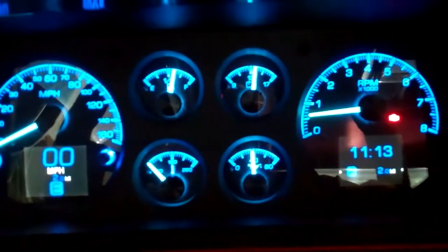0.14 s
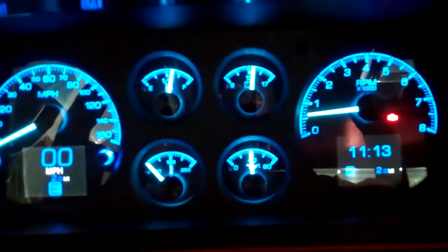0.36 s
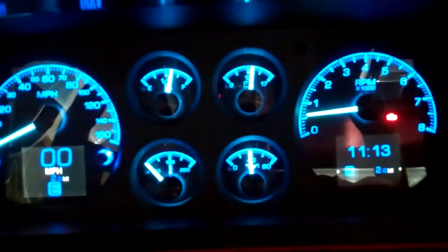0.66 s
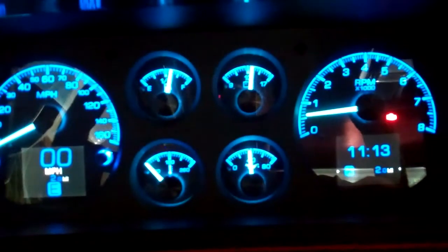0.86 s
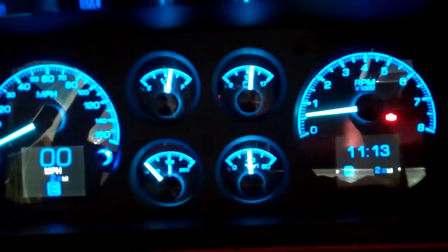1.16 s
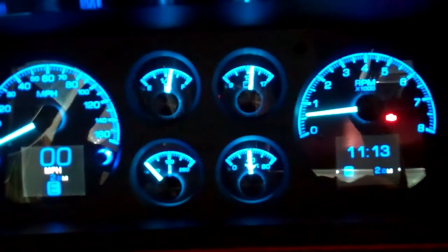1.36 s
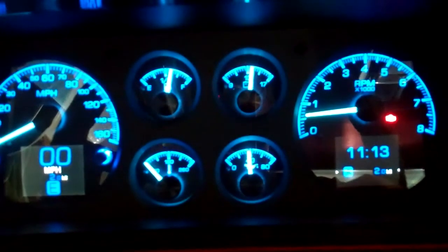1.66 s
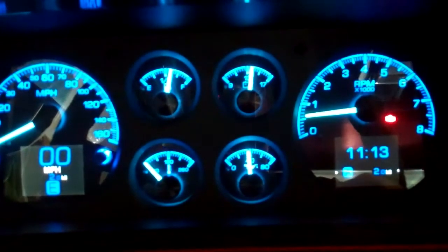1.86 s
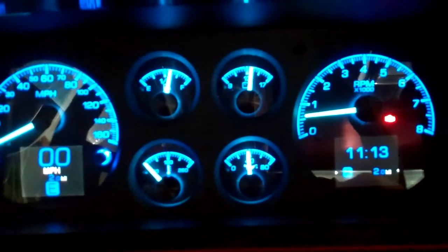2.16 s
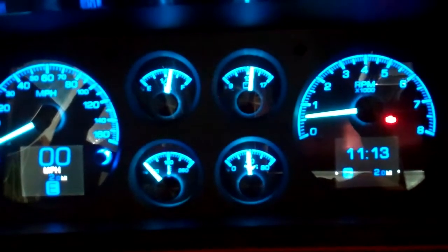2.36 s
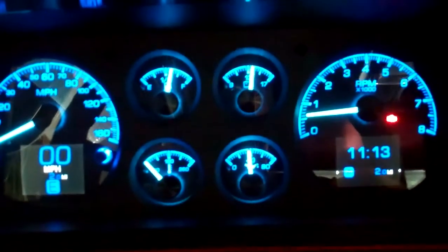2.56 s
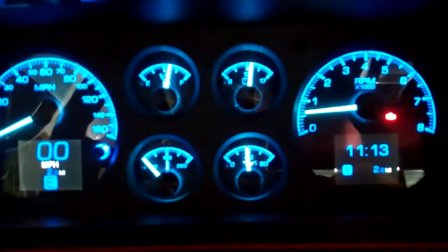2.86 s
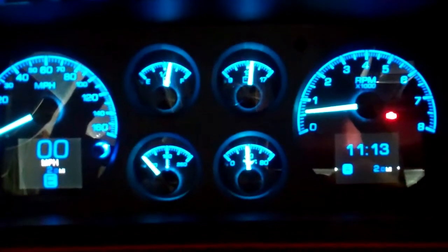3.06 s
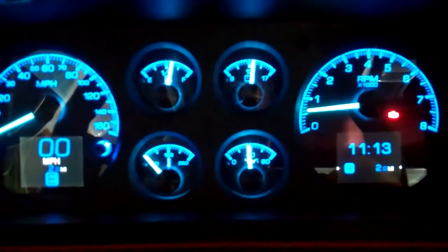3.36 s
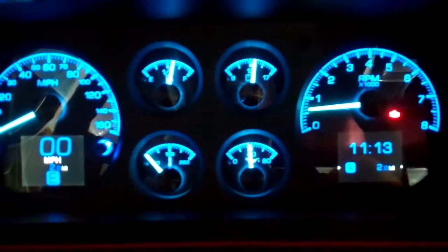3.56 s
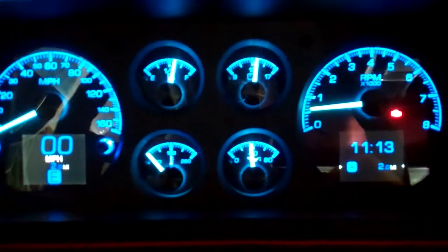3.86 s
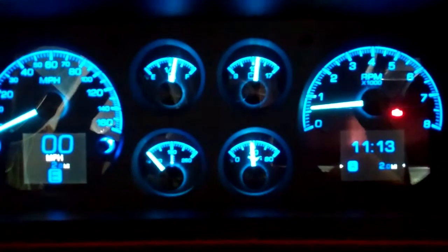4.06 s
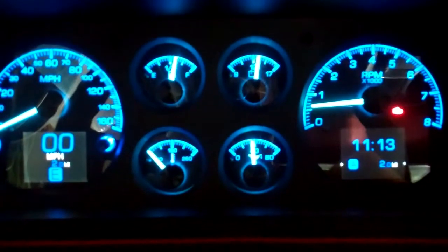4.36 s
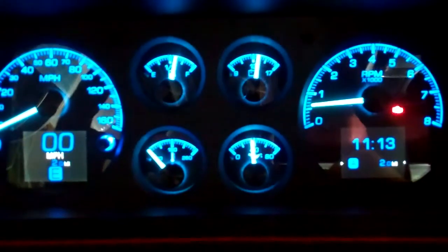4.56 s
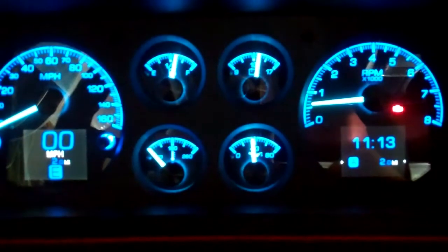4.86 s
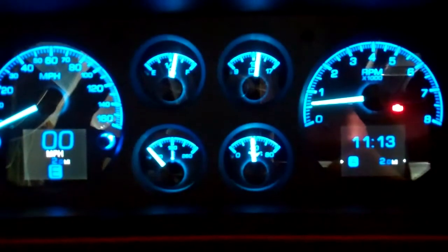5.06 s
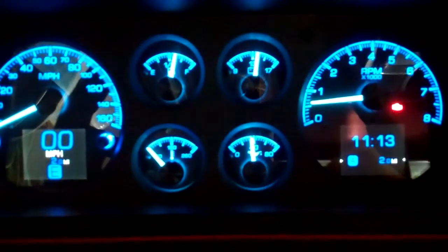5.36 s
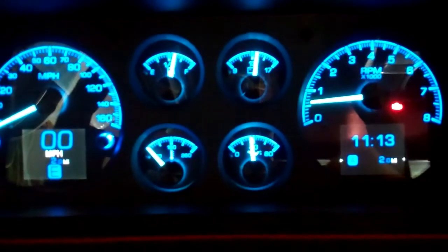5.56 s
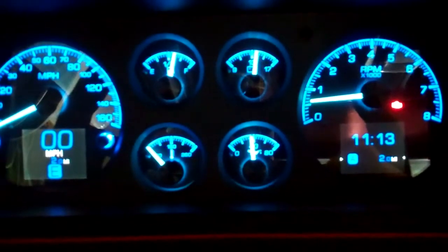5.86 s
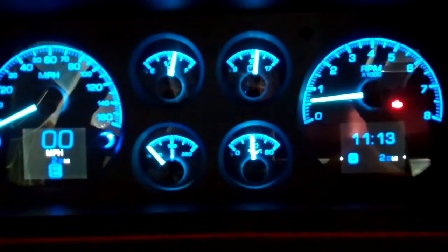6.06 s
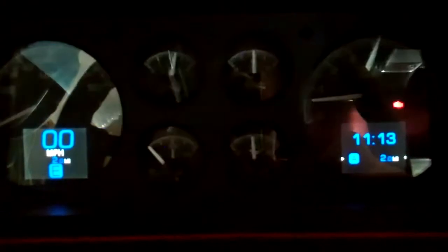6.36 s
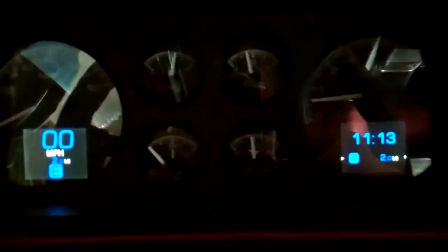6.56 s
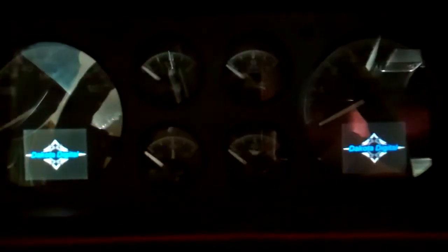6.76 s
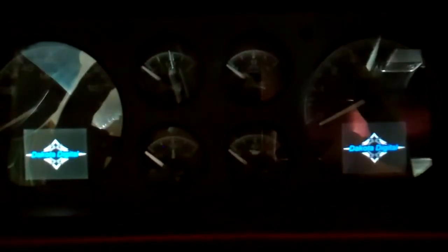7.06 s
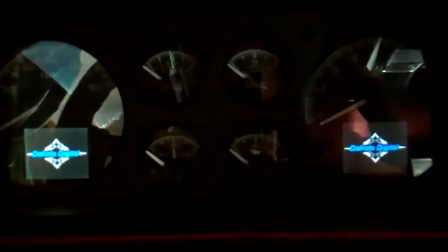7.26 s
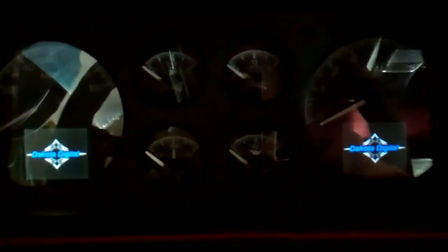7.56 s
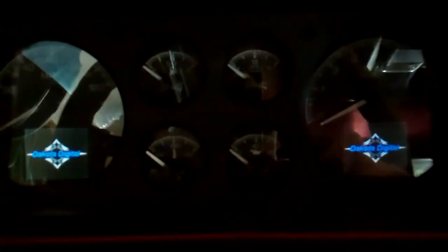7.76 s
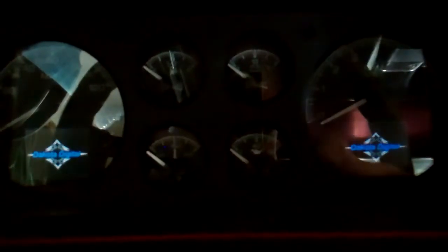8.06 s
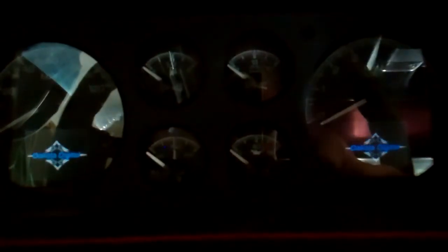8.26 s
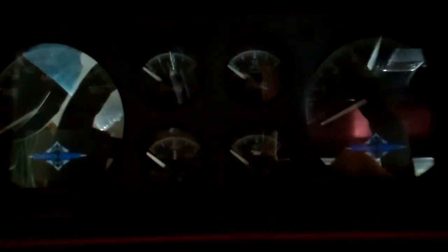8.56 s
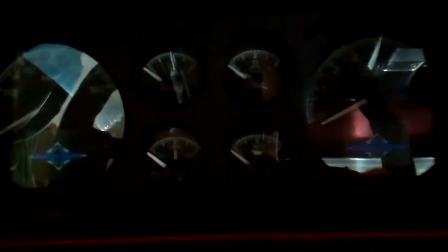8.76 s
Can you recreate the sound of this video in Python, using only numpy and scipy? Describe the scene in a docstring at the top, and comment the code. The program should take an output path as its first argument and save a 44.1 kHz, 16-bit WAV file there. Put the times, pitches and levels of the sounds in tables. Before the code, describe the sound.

A V8 idles with a deep, uneven lope inside a car, then key clicks cut it and it shudders to silence before metallic key clacks.

```python
"""A cross-plane V8 idles with a lope, heard from the driver's seat in a garage: uneven pulses ring the exhaust,
gas noise puffs with the firings, and the alternator whines in sines locked to the hunting crank speed.
The ignition key clicks round, then the engine runs down with shudders, a belt groan and a sigh of air.
The key clacks out of the lock: contact noise and ringing metal, close to the listener and a little left.
Plastic trim ticks now and then; a short cabin echo and quiet noise lie behind."""
import sys
import numpy as np
from scipy import signal
from scipy.fft import rfft, irfft, next_fast_len
from scipy.io import wavfile
from scipy.ndimage import map_coordinates

SR = 44100
rng = np.random.default_rng(int(sys.argv[2]) if len(sys.argv) > 2 else 0)


def int16_out(signal):
    """Quantize to a 16-bit WAV file."""
    q = np.round(np.clip(np.atleast_2d(signal).T, -1, 1) * 32767)
    wavfile.write(sys.argv[1], SR, q.astype(np.int16))


N = 392931
T = np.arange(N) / SR  # time [s]

# Crankshaft speed before hunting, a creeping idle then the coast to rest: (time [s], speed [rpm])
CRANK_SPEED = [(0, 650.3), (6.3, 654), (6.45, 560), (6.65, 380), (6.9, 100), (7.0, 0)]
# Cylinders in firing order: (exhaust bank [0 or 1], pulse strength [ratio])
CYLINDERS = [(0, 1.18), (1, .94), (1, .55), (0, 1.29), (1, .6), (0, .33), (0, 1.19), (1, .96)]
# Exhaust and cabin resonances: (frequency [Hz], width [Hz], level [dB])
PIPE_MODES = [(88.5, 16.5, 2.8), (106.3, 19.6, 2.8), (170, 10, -6), (252, 12, -17)]
# Belt-driven accessories: (multiple of crank speed [ratio], level [dB])
WHINE_TONES = [(73.7, -58), (88.6, -59), (103.7, -58.5), (113.7, -48.5), (147.9, -65), (183.4, -69.5)]
# Noise colours of exhaust gas, engine bay, run-down boom, rumble and engine mounts, intake sigh and still
# garage, each brought to rms 1 before its level is set: (frequency [Hz], relative density [dB per Hz])
GAS_COLOUR = [(71, -25), (120, -3), (172, -9), (199, -16.5), (244, -9.5), (285, -19), (342, -12.5),
              (405, -19.5), (538, -18.5), (672, -28), (779, -21.5), (1060, -25.5), (1240, -22), (1360, -32),
              (1500, -44), (1950, -72), (3300, -120)]
BAY_COLOUR = [(850, -32.5), (1450, -3.5), (1510, -6), (1610, -1), (1690, -4), (2030, -4.5), (2220, -5),
              (2320, -3.5), (2770, -4.5), (3520, -8), (5380, -8), (8960, -15), (12400, -10), (13700, -2),
              (14500, -22)]
BOOM_COLOUR = [(25, -24), (45, -12), (62, -25), (78, 2), (95, -11), (120, -6), (160, -21), (300, -90)]
RUMBLE_COLOUR = [(79, -26.5), (135, 1), (204, -12), (254, -2.5), (290, -14.5), (361, -8.5), (593, -17),
                 (671, -19), (1060, -19.5), (1470, -34), (1600, -32), (2080, -57), (3520, -120)]
MOUNT_COLOUR = [(120, -20), (250, -5), (420, 0), (550, -9), (690, 0), (850, -8), (1050, -3.5), (1400, -21),
                (2500, -50)]
SIGH_COLOUR = [(710, -33.5), (1200, -9), (2620, -1.5), (2910, 0), (3230, -7.5), (13300, -13), (14500, -21)]
GARAGE_COLOUR = [(25, -2), (110, 1), (220, -4.5), (350, -1.5), (500, -7), (800, -6.5), (1300, -9.5),
                 (1800, -8.5), (6000, -8.5), (14500, -8)]
# Left-right likeness of the noises, negative values read as 0: (frequency [Hz], likeness [ratio])
EAR_LIKENESS = [(60, 0.97), (130, 0.99), (290, 0.97), (640, 0.91), (1400, 0.8), (3090, 0.019),
                (6790, -0.44), (14900, -0.03)]
# Engine knocks on its mounts as it stops: (time [s], level [dB])
SHUDDERS = [(6.678, -47.5), (6.8, -50), (6.868, -52.5), (6.97, -65)]
# The belt as it stops: (time [s], half length [s], frequency [Hz], level [dB])
BELT_GROAN = (6.885, .04, 362, -46)
# Key and lock contacts: (time [s], lock body level [dB], knock over body [dB], snap over body [dB],
# ring frequency [Hz], t60 [s])
KEY_CLICKS = [(5.1124, -23, -16, -6, 3190, 0.016), (5.1194, -21, -8, 6.5, 6660, 0.015),
              (5.8546, -26.5, -0.5, -11, 2740, .023), (6.1639, -26.5, -3, -10, 1900, .02),
              (6.1696, -26, -1, -13, 3500, .023), (6.2687, -36.5, -4, 7.5, 4400, 0.036),
              (6.316, -17.5, -9.5, 5, 3120, 0.015), (6.345, -38, -3, 5.5, 1920, .045),
              (6.73, -47.5, -12, -5, 2930, .06), (6.857, -59.5, 11, 10.5, 1100, 0.042),
              (7.9134, -42, -1.5, 10, 4460, 0.057), (8.0331, -38.5, 6, -6.5, 2050, 0.034),
              (8.0641, -43, -9, 11.5, 4370, 0.025), (8.070, -32, -11.5, -14.5, 1940, 0.023),
              (8.1188, -42.5, -7, 1, 4900, 0.032), (8.132, -26, -20, -10, 2500, .022),
              (8.508, -50.5, -7, 0, 1250, 0.065)]
# The key dragged over the tumblers: (time [s], level [dB], knock [dB], body [dB], snap [dB], t60 [s],
# rise [s], blade ring [dB], column thud [dB])
KEY_CLACKS = [(7.934, -34, -9, -4, -3, 0.17, 0.015, -30, -40),
              (7.953, -20, -1.5, 3, -3.5, 0.035, 0.0029, -0.5, -30),
              (8.1328, -13, -6, 3.5, 3, 0.05, 0.0065, -30, -29)]
# Ringing modes of lock with key ring, key blade and steering column: (frequency [Hz], level [dB], t60 [s])
LOCK_MODES = [(1920, -13, 0.045), (4570, -1.5, 0.018), (5680, -7, 0.019), (6640, 2, 0.013),
              (8360, -1, 0.02), (11330, -15, 0.036), (13650, 2, 0.023)]
BLADE_MODES = [(1950, -4.5, .05), (2810, 7, 0.036), (3250, -20, 0.19)]
COLUMN_MODES = [(110.7, -8, 0.35), (141, 0, 0.18), (195, 1, 0.057), (366, -7, 0.08), (616, 1, .06)]
# Plastic trim ticks while the engine shakes the dash: (time [s], level [dB], ring [Hz], ring over crack [dB])
TRIM_TICKS = [(2.539, -45, 2150, 0), (2.663, -41, 1760, 8), (4.196, -41.5, 1960, -4),
              (4.6501, -41.5, 2090, 5)]
# Decay of the upholstered cabin: (frequency [Hz], t60 [s])
CABIN_DECAY = [(120, 0.58), (600, 0.15), (3000, 0.096), (12000, 0.05)]

KEY_OFF_S = 6.325  # the ignition is cut
STALL_S = 6.616  # the crank no longer carries through its compressions
HUNT_RPM, HUNT_PERIOD_S, FIRST_SURGE_S = 5.5, .347, .25  # the idle control overshoots in a slow cycle
WANDER_CYCLES = .0022  # uneven combustion lets the crank run a little ahead or behind
BANK_LAG_S = .00209  # extra travel time through the longer pipe, bank 0
THROB_DB, GROWTH_DB_PER_S = 1.4, .22  # exhaust pulses, growing slowly as the engine idles
COAST_DB = -17  # unfired pulses against fired ones
ENGINE_LAG_S = .00005  # the engine reaches the left ear this much later
BAND_LIMIT_HZ = 14350


def crank(running):
    """Four-stroke cycles done, two turns each; the speed hunts while the engine fires."""
    hunting = HUNT_RPM * np.cos(2 * np.pi * (T - FIRST_SURGE_S) / HUNT_PERIOD_S)
    rpm = np.interp(T, *np.transpose(CRANK_SPEED)) + running * hunting
    cycle = np.cumsum(rpm) / SR / 120 - .273  # starting angle, in cycles
    return cycle + running * WANDER_CYCLES * wobble(8)


def pipe_response(hz):
    """The pipes and cabin resonate side by side in alternating polarity, with the deepest bass cut."""
    total = 0
    for k, (centre, width, db) in enumerate(PIPE_MODES):
        damping = 1j * hz * width
        total = total + (-1) ** k * amp(db) * damping / (centre ** 2 - hz ** 2 + damping)
    low_cut = 1 - 1 / (1 + (hz / 66) ** 10)
    return total * low_cut


def exhaust(cycle, running, scatter_db=1.2, jitter_s=.00018, pulse_db=24, boom_db=-41, stall_db_per_s=130):
    """Eight unequal pulses a cycle ring the pipes, one bank's path longer; unfired, they pump weakly to the stall."""
    count = len(CYLINDERS)
    firing = np.arange(-2, int(cycle[-1] * count))
    bank, strength = np.array(CYLINDERS)[firing % count].T
    chance = rng.standard_normal((len(firing), 2))
    when = np.interp(firing / count, cycle, T) + (bank < .5) * BANK_LAG_S + jitter_s * chance[:, 0]
    sample = np.clip(when * SR, 0, N - 1).astype(int)
    pulses = np.bincount(sample, strength * amp(scatter_db * chance[:, 1]), N)
    drive_db = THROB_DB + GROWTH_DB_PER_S * T + COAST_DB * (1 - running)
    drive = amp(drive_db - stall_db_per_s * np.maximum(T - STALL_S, 0))
    lope = amp(pulse_db) * filtered(pulses * drive, pipe_response)
    # the firing rate itself booms through the body as a clean tone
    body_boom = amp(boom_db) * drive * np.cos(2 * np.pi * count * cycle)
    return lope + body_boom


def gas(cycle, running, gas_db=-36, bay_db=-51):
    """Gas rushes out in a puff as strong as each firing, over the even hiss of the engine bay."""
    strength = np.transpose(CYLINDERS)[1]
    count = len(strength)
    # each puff peaks about one firing after its valve opens
    puffs = np.interp(cycle * count - 1, np.arange(count), strength, period=count)
    stream = rush(GAS_COLOUR)
    burble = filtered(stream, lambda hz: 1 / (1 + (hz / 190) ** 4))
    # the bass follows the puffs fully, the treble only slightly
    treble = (stream - burble) * (1 + .15 * (puffs - 1) + .095 * wobble(30))
    rushing = unit(burble * puffs + treble) * pan(-.4)
    bay = amp(bay_db) * rush(BAY_COLOUR) * pan(.4)
    return running * (amp(gas_db) * rushing + bay)


def alternator(cycle, running, flutter_db=.5, waver=.5):
    """Belt-driven whine, locked to the crank, which turns twice a cycle."""
    tones = 0
    for multiple, db in WHINE_TONES:
        level = amp(db + flutter_db * wobble(35))
        tones = tones + level * np.sin(4 * np.pi * multiple * cycle + waver * wobble(50))
    return np.sqrt(2) * running * tones * pan(-.6)


def rundown(running, boom_db=-39, rumble_db=-49.5, sigh_db=-51, flutter_db=1.5):
    """The unfired engine booms up to the stall and shudders to rest; air sighs into the intake, the belt groans."""
    boom = amp(boom_db) * swell(STALL_S, rise_s=.3, fall_db_per_s=44) * rush(BOOM_COLOUR)
    shaking = sum(amp(db) * swell(s, rise_s=.017, fall_db_per_s=228) for s, db in SHUDDERS)
    knocks = shaking * rush(MOUNT_COLOUR)
    rumble_level = amp(rumble_db + flutter_db * wobble(25))
    rumble = rumble_level * swell(STALL_S, rise_s=1.5, fall_db_per_s=19) * rush(RUMBLE_COLOUR)
    sigh = amp(sigh_db) * swell(6.685, rise_s=.043, fall_db_per_s=58) * rush(SIGH_COLOUR)
    s, half_length, hz, db = BELT_GROAN
    groan_tone = np.sin(2 * np.pi * hz * T + .29 * wobble(60))
    groan = amp(db) * np.exp(-((T - s) / half_length) ** 2) * groan_tone
    return (1 - running) * (boom + knocks + rumble + groan + sigh)


def ignition_lock(ring_db=-6, note_db=-4, rise_s=.00046):
    """Short clicks as the key turns; longer, scraping clacks as it comes out and jolts the column."""
    out, t = np.zeros((2, N + SR)), np.arange(SR // 3) / SR
    for s, db, knock_db, snap_db, hz, t60 in KEY_CLICKS:
        metal = amp(snap_db + ring_db) * ring(LOCK_MODES, t) + ring([(hz, note_db, t60)], t)
        hit = crack(t, knock_db, 0, snap_db) * amp(-60 * t / t60) + metal
        place(out, s, amp(db) * hit * (1 - np.exp(-t / rise_s)))
    for s, db, knock_db, body_db, snap_db, t60, rise, blade_db, thud_db in KEY_CLACKS:
        scrape = crack(t, knock_db, body_db, snap_db) * amp(-60 * t / t60)
        hit = scrape + amp(blade_db) * ring(BLADE_MODES, t) + amp(thud_db) * ring(COLUMN_MODES, t)
        place(out, s, amp(db) * hit * (1 - np.exp(-(t / rise) ** 2)))
    return out[:, :N] * pan(.8)


def trim(t60=.041, rise_s=.00049, knock_db=0, snap_db=-15):
    """Small dull ticks of plastic, each with a short note."""
    out, t = np.zeros((2, N + SR)), np.arange(SR // 8) / SR
    for s, db, hz, note_db in TRIM_TICKS:
        tick = crack(t, knock_db, 0, snap_db) * amp(-60 * t / t60) + ring([(hz, note_db, t60)], t)
        place(out, s, amp(db) * tick * (1 - np.exp(-t / rise_s)))
    return out[:, :N]


def cabin(x):
    """The upholstered cabin answers briefly with decaying noise, longest in the bass."""
    hz, t, noise = signal.stft(rng.standard_normal((2, SR // 2)), SR, nperseg=256)
    decay = amp(-60 * t / along(CABIN_DECAY, hz)[:, None])
    tail = signal.istft(noise * decay, SR, nperseg=256)[1]
    return signal.fftconvolve(x, tail / np.linalg.norm(tail[0]), axes=1)[:, :N]


def still_garage(level_db=-56.5):
    """The quiet of the garage: steady coloured noise."""
    return amp(level_db) * rush(GARAGE_COLOUR)


def ring(modes, t):
    """Damped modes at new strengths, each reaching the two ears at its own phase."""
    total = 0
    for hz, db, t60 in modes:
        level = amp(db + rng.normal(0, .79) - 60 * t / t60)
        total = total + level * np.sin(2 * np.pi * hz * t + rng.normal(0, .35, (2, 1)))
    return total


def crack(t, knock_db, body_db, snap_db):
    """Contact noise in three bands, low knock, body and snap; wider toward the treble."""
    out = 0
    bands = [((380, 1500), knock_db, .25), ((1500, 5200), body_db, .6), ((5400, 16500), snap_db, 1)]
    for edges_hz, db, width in bands:
        band = signal.butter(2, edges_hz, 'band', fs=SR, output='sos')
        mid, side = signal.sosfilt(band, rng.standard_normal((2, len(t))))
        out = out + amp(db) * (unit(mid) + width * unit(side) * np.array([[1], [-1]]))
    return out


def rush(colour):
    """Stereo noise of rms 1, alike at both ears in the bass."""
    def mid_side(hz):
        turn = np.arccos(np.clip(along(EAR_LIKENESS, hz), 0, 1)) / 2
        return amp(along(colour, hz)) * np.array([np.cos(turn), np.sin(turn)])
    mid, side = filtered(rng.standard_normal((2, N)), mid_side)
    return unit(np.array([mid + side, mid - side]))


def swell(s, rise_s, fall_db_per_s):
    """A rounded rise to 1 at time s, then an even fall in dB."""
    rise = np.exp(-(np.minimum(T - s, 0) / rise_s) ** 2)
    return rise * amp(-fall_db_per_s * np.maximum(T - s, 0))


def wobble(rate):
    """A smooth random curve, rate knots a second."""
    return map_coordinates(rng.standard_normal(int(N * rate / SR) + 4), [T * rate])


def filtered(x, response):
    """x times a response of frequency."""
    m = next_fast_len(N + SR // 2)
    return irfft(rfft(x, m) * response(np.fft.rfftfreq(m, 1 / SR)), m)[..., :N]


def along(points, hz):
    """(frequency [Hz], value) points read on a log axis."""
    f, v = np.transpose(points)
    return np.interp(np.log(hz + 1), np.log(f + 1), v)


def place(out, s, hit):
    """Add a stereo hit at time s."""
    out[:, round(s * SR):][:, :hit.shape[1]] += hit


def pan(left_db):
    """Gains that raise the left ear and lower the right by left_db."""
    return amp([[left_db], [-left_db]])


def amp(db):
    """Decibels to gain."""
    return 10 ** (np.asarray(db) / 20)


def unit(x):
    """Scale to rms 1."""
    return x / np.sqrt(np.mean(x ** 2) + 1e-20)


def scene():
    """Engine, key, dashboard and the still garage."""
    running = np.clip((KEY_OFF_S - T) / .065 + .5, 0, 1)  # firing fades over 65 ms
    cycle = crank(running)
    engine = exhaust(cycle, running) * pan(-.25) + gas(cycle, running)
    engine = engine + alternator(cycle, running) + rundown(running)
    ears = np.array([[1], [-1]])
    engine = filtered(engine, lambda hz: np.exp(-1j * np.pi * hz * ENGINE_LAG_S * ears))
    clicks = ignition_lock() + trim()
    return engine + clicks + amp(-10) * cabin(clicks) + still_garage()


def record(dry):
    """The recorder keeps almost nothing above its band limit."""
    return filtered(dry, lambda hz: 1 / np.sqrt(1 + (hz / BAND_LIMIT_HZ) ** 240))


dry = scene()
out = record(dry)
int16_out(out)
```